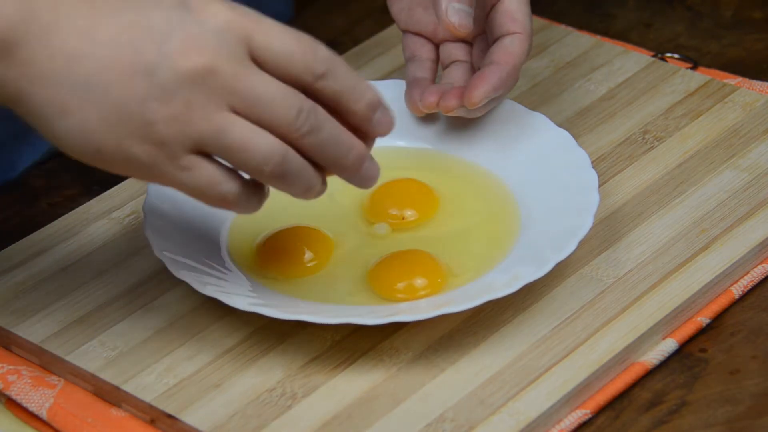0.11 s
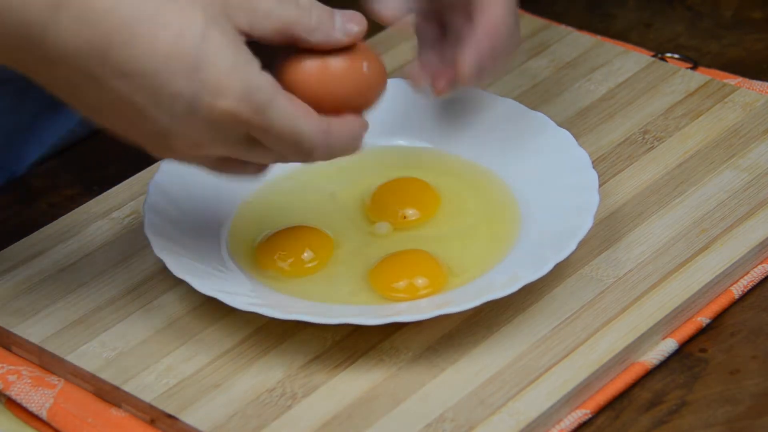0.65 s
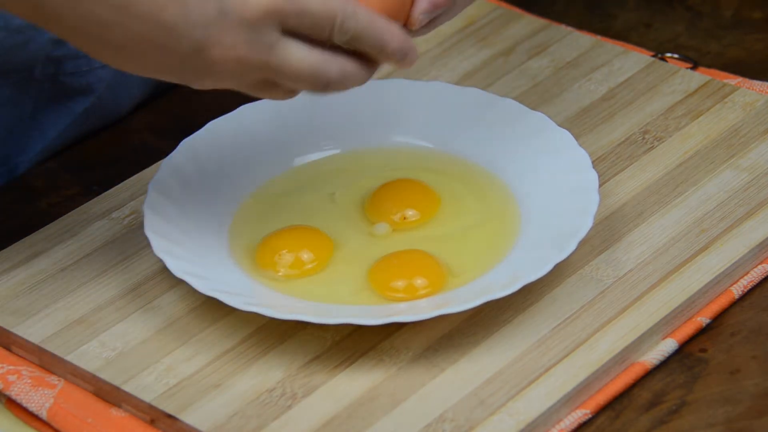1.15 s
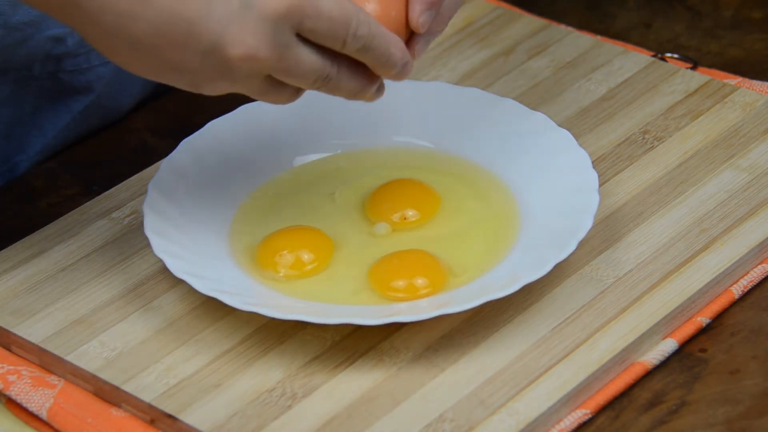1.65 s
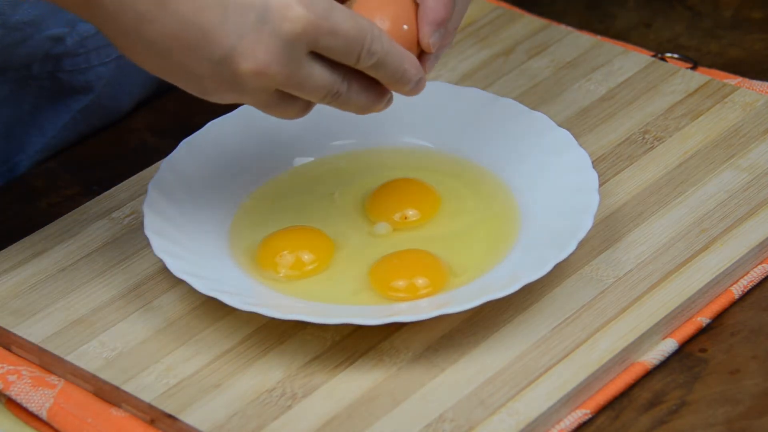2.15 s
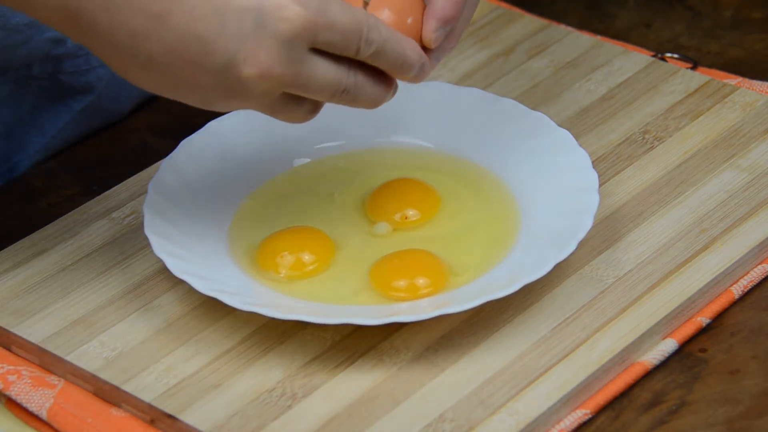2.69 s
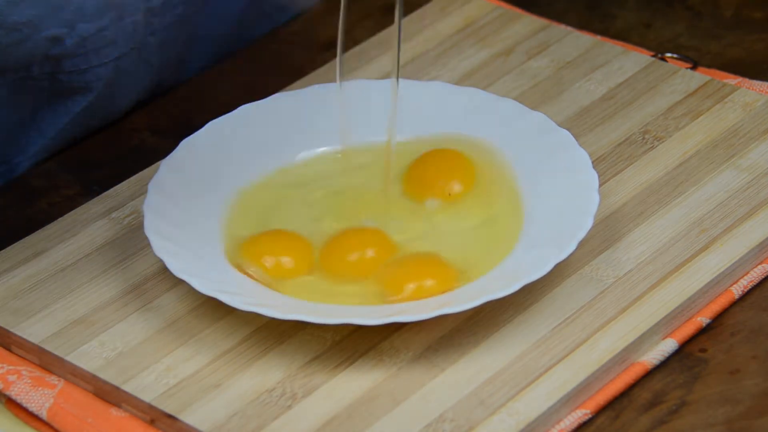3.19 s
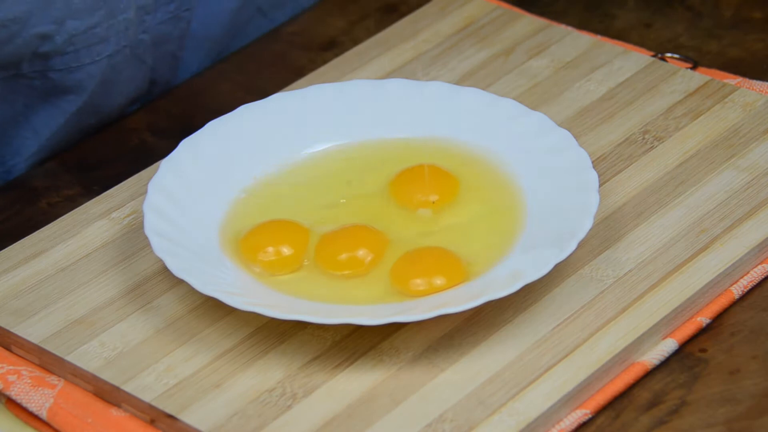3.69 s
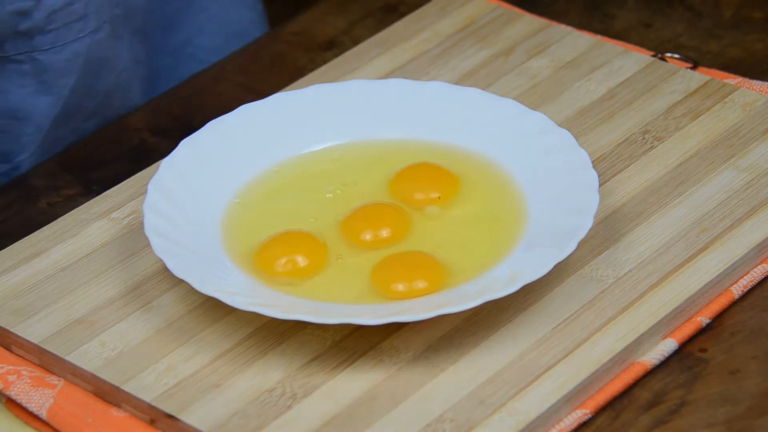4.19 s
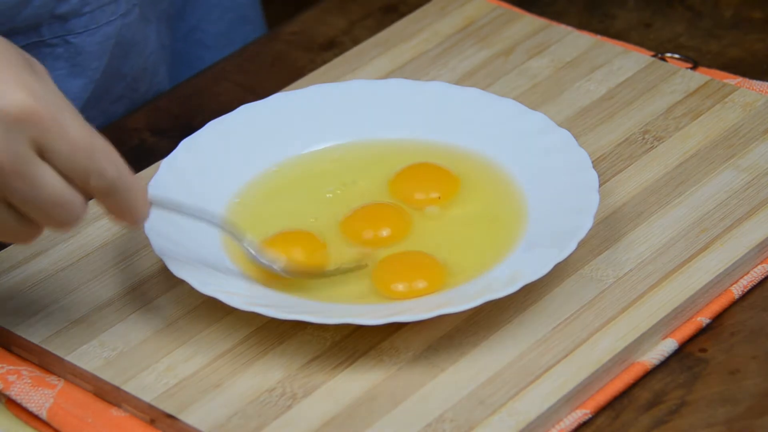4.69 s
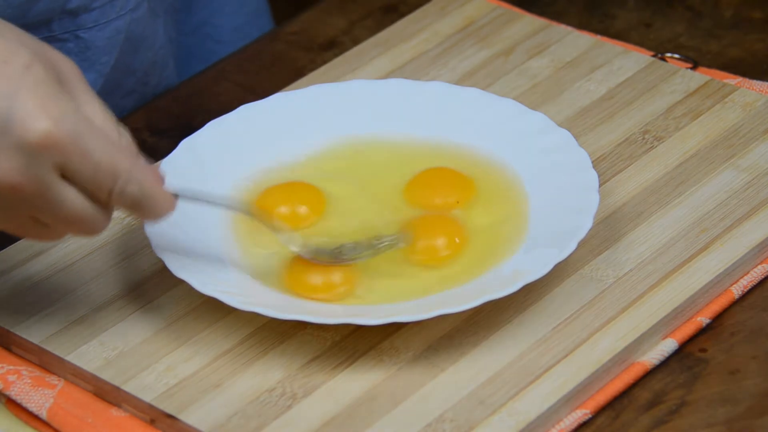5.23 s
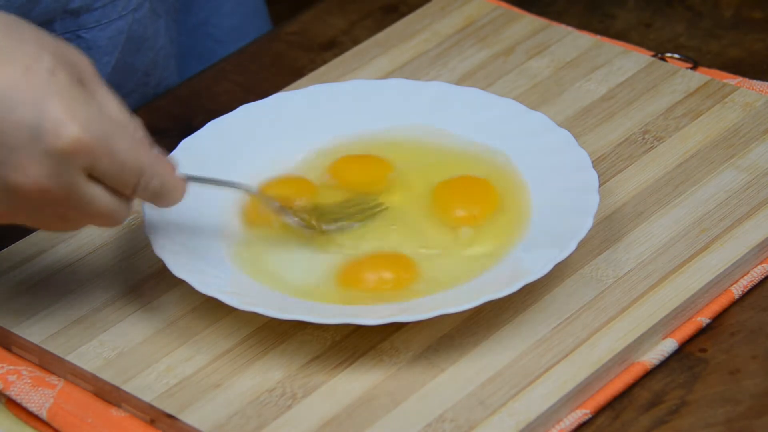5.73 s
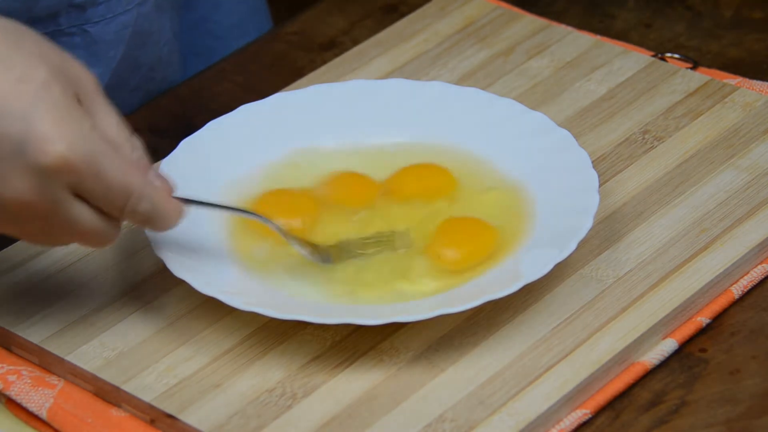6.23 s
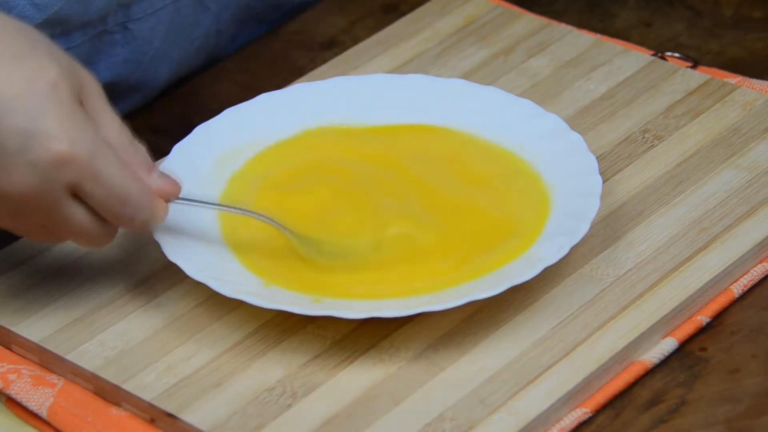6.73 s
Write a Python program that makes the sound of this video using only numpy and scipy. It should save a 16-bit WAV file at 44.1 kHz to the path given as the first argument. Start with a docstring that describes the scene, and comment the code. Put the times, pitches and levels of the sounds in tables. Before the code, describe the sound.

Close kitchen sounds: loud egg knocks, brittle shell snaps, soft handling, bright fork taps on a plate, then three hard knife chops on a board.

```python
"""Close microphone in a hard-walled kitchen, three shots cut together, with room air under all of them.
First an egg is knocked on the counter (broadband pulses), its shell cracks open (snaps with short rings),
and a wet plip and a chip of shell land. Then hands shift things (dull pulses, friction noise) and a fork taps
and scrapes a ceramic plate (ringing modes), fading down. Last a knife chops on a wooden board (pulses).
Every blow is also convolved with the room's tail."""
import sys
import numpy as np
from scipy import signal
from scipy.fft import rfft, irfft
from scipy.io import wavfile
from scipy.ndimage import uniform_filter1d

SR = 44100
rng = np.random.default_rng(int(sys.argv[2]) if len(sys.argv) > 2 else 0)


def voltage_ratio(decibels):
    """Convert decibels (scalar or array-like) to amplitude ratios, 20 dB per decade."""
    exponent = np.asarray(decibels, float) / 20
    return 10 ** exponent


def transcribe(signal):
    """Save signal, clipped to [-1, 1], as a 16-bit WAV file at the path in sys.argv[1]."""
    frames = np.atleast_2d(signal).T
    limited = np.clip(frames, -1, 1)
    pcm = np.round(limited * 32767).astype(np.int16)
    wavfile.write(sys.argv[1], SR, pcm)


N = 302967
LEAD = 2048  # samples computed ahead of time 0
TIME_S = (np.arange(N + LEAD) - LEAD) / SR

# shots, silence between: start_s, end_s
SHOTS = [(0, 3.947), (3.966, 6.376), (6.383, 7)]
# egg on the counter: start_s, level_db, low_db, high_db, scuff_db
KNOCKS = [(-.012, 3.5, -7, 1.5, -5), (.341, 2, -3.5, 11.5, 1), (.347, 4, -1.5, 1, -7.5)]
# counter colour: freq_hz, relative_db
COUNTER = [(24, -57), (40, -12), (112, -10.5), (226, -12), (354, 0), (412, -1.5), (570, -2), (873, -4),
           (1020, -7.5), (1720, -8.5), (3740, -27.5), (5720, -33.5), (8550, -36), (13800, -58),
           (16000, -73.5)]
# dishes that answer the knock: freq_hz, width_hz, boost_db
RATTLE = [(418, 77, 0), (654.5, 34, 7.5), (885, 87, 4), (1720, 380, 4), (3445, 600, 3), (4230, 150, 2),
          (4980, 110, 8.5), (6750, 100, 12.5), (7250, 200, 6.5), (8500, 250, 5.5)]
# room decay: freq_hz, t60_s
ROOM = [(100, 0.79), (260, 0.52), (700, 0.61), (1840, 0.67), (4850, 0.53), (12800, 0.38)]
# share sent to the room: one send_db each for knocks, shell, taps, scrapes, bumps, thump, chops
SENDS_DB = [6, -1, -3.5, -5, 6, -2.5, 1.5]
# decay time constant of the contact: one scuff_s each for knocks, bumps, chops
SCUFF_S = [0.0055, 0.0046, .003]
# room air colour: freq_hz, relative_db
AIR = [(12, -33), (20, -18), (91, -4.5), (124, -9.5), (250, -8.5), (322, -12.5), (370, -9.5), (533, -9.5),
       (597, -14), (935, -12.5), (1730, -17.5), (3400, -21.5), (5630, -28), (15000, -48.5), (16400, -72)]
# room air before the fade: time_s, level_db
AIR_LEVEL = [(0, -48.5), (1, -59), (2.5, -59.5), (3.5, -58), (3.9, -60.5), (6.87, -57.5)]
# low rumble before the fade: time_s, level_db
RUMBLE_LEVEL = [(0, -59), (.9, -62), (2.4, -63), (3, -71), (6.87, -71.5)]
# loud shell cracks: start_s, level_db, ring_hz, snap_db
CRACKS = [(1.384, -37, 1700, 1), (1.4, -27, 1500, 23), (1.737, -41.5, 1780, 4), (1.831, -37, 1870, 14),
          (1.857, -35.5, 1540, 8.5), (2.468, -21, 1790, 37), (2.473, -21.5, 1950, -27),
          (2.478, -26, 2180, -35), (2.48, -24.5, 3520, -13), (2.51, -26, 2330, -1),
          (2.519, -24.5, 690, 17.5), (2.535, -31, 2490, -17), (2.718, -19, 2600, 4.5),
          (2.722, -13, 1350, 32), (2.912, -31, 2000, -25), (2.922, -27, 1700, -36)]
# taps on the plate, first a chip of shell, then the fork:
# start_s, level_db, spot (0 rim, 1 well), mid_db (1600 Hz against 4300 Hz), top_db (9000 Hz against 4300 Hz)
TAPS = [(3.241, -37.5, 0.17, 10, 17), (4.738, -6.5, 0.055, -6, 0.5), (4.943, -17, 0.44, -3.5, 2),
        (5.143, -30, 0.45, 10, -4), (5.322, -23, 0.55, 0.5, -1.5), (5.703, -15.5, 0.89, 0.5, 3.5),
        (5.902, -17, 0.75, 0, 1.5), (6.241, -37, 0.41, 13, 5), (6.297, -24.5, 0.57, -1, -12)]
# plate modes: freq_hz, rim_db, well_db, t60_s (undamped)
PLATE = [(383, -16, -31, 0.12), (445, 1.5, -9.5, 0.034), (620, -30.5, 3.5, 0.13), (882, -17, -22.5, 0.3),
         (1270, -31.5, -2.5, 0.11), (1518, -11, -16.5, 0.14), (1647, -10.5, -5, 0.053),
         (2440, 9, -28, 0.042), (2600, -1.5, -0.5, 0.042), (2722, 1.5, -30, 0.12), (3200, -55, -14.5, 0.33),
         (3660, 0.5, -37, 0.043), (4570, -14.5, -11, 0.015), (4135, -5, -7, 0.025), (4420, 6, -5.5, 0.099),
         (4254, -39.5, -37, 0.033), (4500, -25, -5, 0.033), (4870, 4, -7.5, 0.044), (5510, -11, -16, 0.1),
         (6070, -25, -12.5, 0.085), (6580, -13, -17, 0.081), (6370, -29, -15, 0.041),
         (7180, 1.5, 0.5, 0.049), (8070, -32, 5, 0.04), (8890, 5.5, -1.5, 0.031), (10170, -5.5, -21, 0.12),
         (11140, -10.5, -12.5, 0.051), (12310, -17.5, -18, 0.1), (13270, -18, -18, 0.12),
         (14300, -35, -34, .06)]
# corners of the tilt a tap lays over the modes: freq_hz
TILT_HZ = [500, 1600, 2700, 4300, 9000]
# friction after a grip: start_s, level_db
RUSTLE = [(3.968, -46), (4.15, -56), (4.418, -48)]
# hands and soft things, colour: freq_hz, relative_db
HANDS = [(24, -40), (40, -24), (115, -13), (283, -11.5), (402, -5), (770, -10), (1520, -7), (5050, -16.5),
         (5720, -20.5), (7930, -18.5), (16000, -52.5)]
# soft bumps of hands and dishes: start_s, level_db, low_db, high_db, scuff_db
BUMPS = [(3.972, -47, -33, -8, 2), (3.993, -23, 10, 14, -15), (4.265, -31, 4, 0, -27),
         (4.43, -21, 6, 2.5, -6)]
# something soft set down: start_s, level_db, ring_hz, snap_db
THUMP = [(4.203, -33.5, 235, -38)]
# tines catching on the glaze: start_s, level_db, ring_hz, snap_db
SCRAPES = [(5.257, -25, 4500, -31.5), (5.259, -33, 3160, -25.5), (5.321, -22, 7370, -13),
           (5.468, -39, 8040, -9), (5.51, -26, 3140, 14), (5.65, -42, 4100, 7), (5.705, -11.5, 4340, -13.5),
           (5.84, -35, 8370, -7.5), (5.902, -11.5, 4190, -1)]
# knife on the board: start_s, level_db, low_db, high_db, scuff_db
CHOPS = [(6.386, 0.5, 4, -3.5, 3.5), (6.532, -8, 14, 3.5, -6), (6.549, 8.5, -0.5, -4.5, -6),
         (6.707, -31, 6, 13.5, -23.5), (6.737, 6.5, 0, -4.5, -3.5)]
# board colour: freq_hz, relative_db
BOARD = [(24, -63), (40, -33), (290, -19), (433, -16), (1090, -15), (1720, -4), (2050, -10.5), (2320, -9),
         (3560, -17.5), (4240, -14), (5870, -26.5), (8340, -16.5), (10700, -37), (13400, -39),
         (16000, -60.5)]
# board and blade resonances: freq_hz, width_hz, boost_db
BLADE = [(1460, 80, 4), (1810, 410, 4), (2330, 34, 2), (2640, 220, 2), (3316, 180, 6), (4145, 250, 5.5),
         (8370, 230, 4.5), (9500, 810, 7.5)]
# microphone housing: freq_hz, half_width_hz, gain_db
NOTCHES = [(5800, 130, -9), (6950, 100, -5)]


def shape(x, points):
    """Filter by (freq_hz, gain_db) points."""
    hz, db = np.transpose(points)
    f = np.fft.rfftfreq(len(x), 1 / SR) + 1
    return irfft(rfft(x) * voltage_ratio(np.interp(np.log(f), np.log(hz), db)), len(x))


def curve(rows):
    """Gain over time from (time_s, level_db) rows."""
    return voltage_ratio(np.interp(TIME_S, *np.transpose(rows)))


def noise(points, size=len(TIME_S)):
    """Coloured noise of rms 1."""
    x = shape(rng.standard_normal(size), points)
    return x / x.std()


def unit(x):
    """Scale to a peak of 1."""
    return x / np.abs(x).max()


def add(track, start_s, level_db, sound):
    """Place a sound at its time and level."""
    i = LEAD + int(start_s * SR)
    sound = sound[:len(track) - i]
    track[i:i + len(sound)] += voltage_ratio(level_db) * sound


def click(points, size=8192):
    """Minimum-phase pulse with a (freq_hz, gain_db) spectrum, folded from the cepstrum."""
    hz, db = np.transpose(points)
    f = np.fft.rfftfreq(size, 1 / SR) + 1
    cepstrum = irfft(np.log(voltage_ratio(np.interp(np.log(f), np.log(hz), db))), size)
    cepstrum[1:size // 2] *= 2
    cepstrum[size // 2 + 1:] = 0
    return unit(irfft(np.exp(rfft(cepstrum)), size))


def blows(rows, body, peaks, scuff_s):
    """Dull bodies: a pulse of the body's colour, then a short scuff of contact."""
    out = np.zeros(len(TIME_S))
    t = np.arange(4096) / SR
    hz = np.geomspace(20, 20000, num=600)
    freq_hz, relative_db = np.transpose(body)
    body_db = np.interp(np.log(hz), np.log(freq_hz), relative_db)
    for centre_hz, width_hz, boost_db in peaks:
        body_db += boost_db / (1 + (2 * (hz - centre_hz) / width_hz) ** 2)
    for start_s, level_db, low_db, high_db, scuff_db in rows:
        tilt_db = np.interp(np.log(hz), np.log([700, 1700, 7000]), [low_db, 0, high_db])
        # cubed noise: most grains tiny, a few large
        grains = rng.standard_normal(len(t)) ** 3 * np.exp(-t / scuff_s) / 20
        force = voltage_ratio(scuff_db) * grains
        force[0] = 1
        # first contact and grains share the energy
        force /= np.sqrt(np.sum(force ** 2))
        pulse = click(list(zip(hz, body_db + tilt_db)))
        add(out, start_s, level_db, signal.fftconvolve(force, pulse))
    return out


def knocks():
    """Egg hits the counter; dishes add their resonances to its colour."""
    return blows(KNOCKS, COUNTER, RATTLE, SCUFF_S[0])


def kitchen():
    """Room response: a dense tail that builds up quickly, each band dying at its own rate."""
    t = np.arange(SR) / SR
    freq_hz, t60_s = np.transpose(ROOM)
    tail = 0
    for hz in 60 * 2 ** np.arange(0, 8.5, .5):
        band_t60_s = np.interp(np.log(hz), np.log(freq_hz), t60_s)
        passband = [(hz / 1.42, -40), (hz / 1.19, -3), (hz, 0), (hz * 1.19, -3), (hz * 1.42, -40)]
        band = shape(rng.standard_normal(SR), passband)
        tail = tail + band * voltage_ratio(-60 * t / band_t60_s)
    # lumpy at first, smoother later
    lumps_db = 1.5 * np.exp(-t / .06) * noise([(50, 0), (400, 0), (900, -30)], size=SR)
    tail = tail * voltage_ratio(lumps_db) * np.minimum(t / 0.004, 1)
    return tail / np.sqrt(np.sum(tail ** 2))


def room_air():
    """Steady coloured noises: air, low rumble and hiss."""
    air = noise(AIR) * curve(AIR_LEVEL)
    rumble = noise([(15, -18.5), (25, 8), (60, 2), (110, -37.5)]) * curve(RUMBLE_LEVEL)
    hiss = noise([(3000, -30), (6000, -0.5), (8000, 0.5), (11000, -7), (16000, -31.0)]) * voltage_ratio(-74)
    return air + rumble + hiss


def snaps(rows, snap, q, gap_s, after_db, spread):
    """A bright snap with a ring that swells and dies in a few cycles; two splinters follow."""
    out = np.zeros(len(TIME_S))
    t = np.arange(4096) / SR
    for start_s, level_db, ring_hz, snap_db in rows:
        for k, (late, detune) in enumerate(rng.random((3, 2))):
            hz = ring_hz * (1 + (k > 0) * spread * 2 * (detune - .5))
            age = 2 * np.pi * hz / q * t
            rough = 1 + 0.5 * uniform_filter1d(rng.standard_normal(len(t)), size=9)
            ring = rough * np.sin(2 * np.pi * hz * t) * age * np.exp(1 - age)
            sound = unit(ring + voltage_ratio(snap_db) * click(snap)[:len(t)])
            add(out, start_s + k * gap_s * (.5 + late), level_db + k * after_db, sound)
    return out


def crackles():
    """Faint cracks as thumbs press the shell: scattered in time, level, pitch and brightness."""
    start_s, end_s, count = 1.5, 2.42, 9
    rows = []
    for when, (a, b, c) in zip(rng.random(count), rng.standard_normal((count, 3))):
        # means -49 dB, 1750 Hz, -6 dB snap
        rows.append((start_s + (end_s - start_s) * when, -49 + 3.2 * a, 1750 * (1 + 0.072 * b), -6 + 7 * c))
    return rows


def shell_cracks():
    """Brittle shell breaks: bright snaps, low-Q rings."""
    snap = [(200, 2), (1500, 19.5), (4000, 16.5), (8000, 17.5), (12000, 2), (14500, -9), (16000, -28.5)]
    return snaps(CRACKS + crackles(), snap, q=7, gap_s=.004, after_db=-6, spread=0.05)


def drip():
    """Egg white plips into the dish: one narrow ring, hardly any snap."""
    row = (3.241, -40, 1633, -30)  # start_s, level_db, ring_hz, snap_db
    return snaps([row], HANDS, q=24, gap_s=.003, after_db=-20, spread=.02)


def plate_taps():
    """Chip, then tines strike the plate: paired modes ring briefly, damped towards the well by egg."""
    ring_rim, ring_well = 0.77, 0.2  # share of the undamped t60
    pair_split = .012  # greatest relative detuning of a mode's twin
    chatter_s, chatter_db = .004, -31  # tines chatter after landing
    out = np.zeros(len(TIME_S))
    t = np.arange(8192) / SR
    hz, rim_db, well_db, t60_s = np.transpose(PLATE)[:, :, None]
    for start_s, level_db, spot, mid_db, top_db in TAPS:
        spot = np.clip(spot, 0, 1)
        share = ring_rim + spot * (ring_well - ring_rim)
        chance = rng.standard_normal((5, len(hz), 1))
        # the spot struck decides which modes wake
        mode_db = rim_db + spot * (well_db - rim_db) + 2.1 * chance[0]
        tilt_db = np.interp(np.log(hz), np.log(TILT_HZ), [0, mid_db, 0, 0, top_db])
        mode_hz = hz * (1 + .002 * chance[1])
        twin_hz = hz * (1 + pair_split * np.tanh(chance[4]))
        swing = np.sin(2 * np.pi * mode_hz * t + chance[2])
        swing += 0.75 * np.sin(chance[3]) * np.sin(2 * np.pi * twin_hz * t + chance[2] + np.pi / 2)
        decay = voltage_ratio(-60 * t / (share * t60_s))
        ring = np.sum(voltage_ratio(mode_db + tilt_db) * decay * swing, axis=0)
        ring *= np.minimum(t / 0.001, 1)
        force = voltage_ratio(chatter_db) * rng.standard_normal(1024) ** 3 * np.exp(-t[:1024] / chatter_s) / 4
        force[0] = 1
        ring = signal.fftconvolve(ring, force)[:len(t)]
        tick = click([(100, -75), (500, -7), (1600, mid_db), (4300, 10), (9000, top_db), (16000, top_db - 25.5)])
        add(out, start_s, level_db, unit(unit(ring) + voltage_ratio(-12) * tick))
    return out


def mid_swell():
    """Faint mid-band noise under a bell-shaped envelope."""
    centre_s, half_s, level_db, hz = 3.5, 0.3, -66, 998
    bell = np.exp(-((TIME_S - centre_s) / half_s) ** 2)
    return noise([(hz / 2, -20), (hz, 0), (hz * 2, -20)]) * voltage_ratio(level_db) * bell


def rustle():
    """Cloth and skin slide: patchy friction noise that swells after each grip and dies away."""
    rise_s, slope_db_per_s = 0.034, -38
    patchy = voltage_ratio(1.5 * noise([(5, 0), (30, 0), (80, -30)]))
    swell = 0
    for start_s, level_db in RUSTLE:
        age_s = np.maximum(TIME_S - start_s, 0)
        swell = swell + np.minimum(age_s / rise_s, 1) * voltage_ratio(level_db + slope_db_per_s * age_s)
    return noise(HANDS) * patchy * swell


def bumps():
    """Hands and dishes bump softly: dull pulses with scuffs."""
    return blows(BUMPS, HANDS, [], SCUFF_S[1])


def thump():
    """Something soft is set down: a low, heavily damped ring."""
    return snaps(THUMP, HANDS, q=4.7, gap_s=0.018, after_db=-5, spread=0.6)


def tine_scrapes():
    """Tines catch on the glaze: short treble rings."""
    snap = [(500, -3.5), (3000, 23.5), (9000, 5.5), (16000, -22.5)]
    return snaps(SCRAPES, snap, q=13, gap_s=0.0052, after_db=-5.5, spread=0.032)


def fade():
    """Gain of the edit: the second shot fades to a floor, the last has a fixed gain."""
    from_s, slope_db_per_s, floor_db, last_shot_db = 5.912, -43.5, -16.5, -2
    db = np.clip(slope_db_per_s * (TIME_S - from_s), floor_db, 0)
    return voltage_ratio(np.where(TIME_S < SHOTS[-1][0], db, last_shot_db))


def chops():
    """Knife hits the board: pulses coloured by board and blade resonances."""
    return blows(CHOPS, BOARD, BLADE, SCUFF_S[2])


def scene():
    """Each source sends its own share to the room; a cut ends the tail of the shot before it."""
    shell = shell_cracks() + drip()
    # order of SENDS_DB
    sources = [knocks(), shell, plate_taps(), tine_scrapes(), bumps(), thump(), chops()]
    near = sum(sources)
    send = sum(x * voltage_ratio(send_db) for x, send_db in zip(sources, SENDS_DB))
    steady = room_air() + mid_swell() + rustle()
    out, room = 0, kitchen()
    for start_s, end_s in SHOTS:
        heard = (TIME_S >= start_s) & (TIME_S < end_s)
        # the first shot keeps its lead-in
        played = (TIME_S < end_s) & ((TIME_S >= start_s) | (start_s == 0))
        tail = signal.fftconvolve(send * played, room)[:len(TIME_S)]
        out = out + heard * (near + steady + tail)
    return (out * fade())[None, LEAD:]


def band_limit(x):
    """A steep low-pass at the top of the band."""
    return signal.sosfilt(signal.butter(12, 16510, fs=SR, output="sos"), x)


def record(dry):
    """The housing notches the treble, the loudest peaks clip and the top is cut."""
    ceiling, top_hz = .83, 16300  # ceiling as a share of full scale
    f = np.fft.rfftfreq(N, 1 / SR)
    notch_db = sum(db / (1 + ((f - hz) / half_width_hz) ** 2) for hz, half_width_hz, db in NOTCHES)
    x = irfft(rfft(dry) * voltage_ratio(notch_db), N)
    x = np.clip(x, -ceiling, ceiling)
    x = signal.sosfilt(signal.ellip(8, .2, 70, top_hz, fs=SR, output="sos"), x)
    return band_limit(x)


dry = scene()
out = record(dry)
transcribe(out)
```